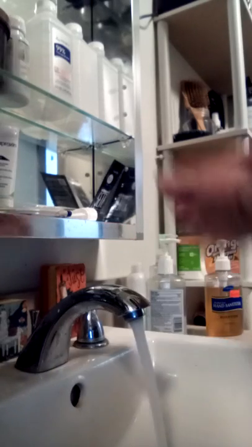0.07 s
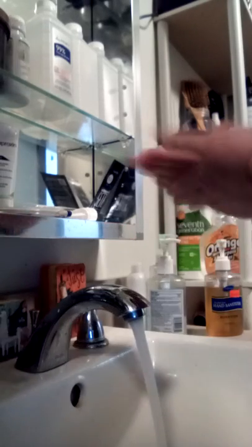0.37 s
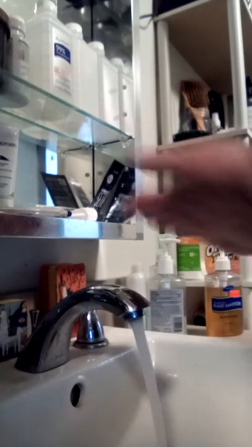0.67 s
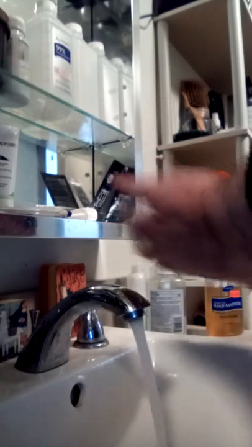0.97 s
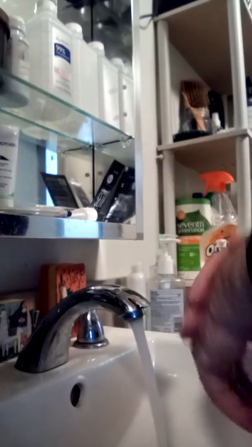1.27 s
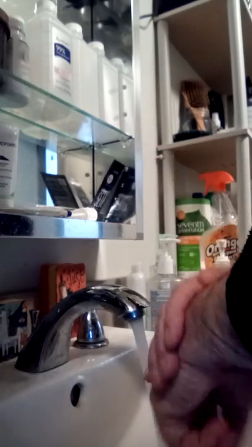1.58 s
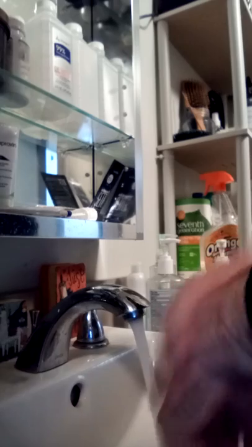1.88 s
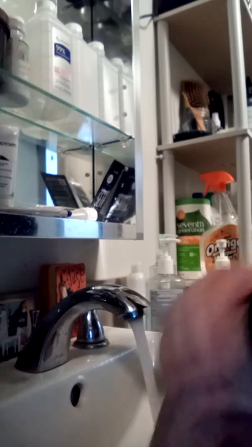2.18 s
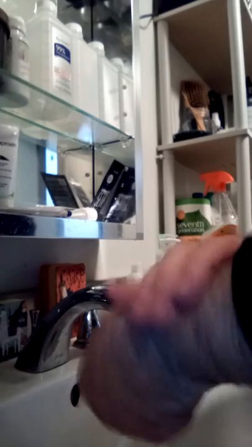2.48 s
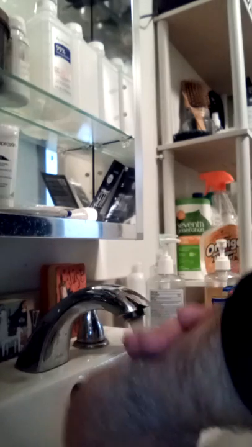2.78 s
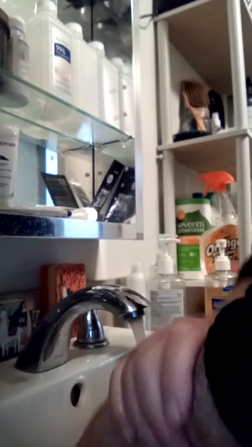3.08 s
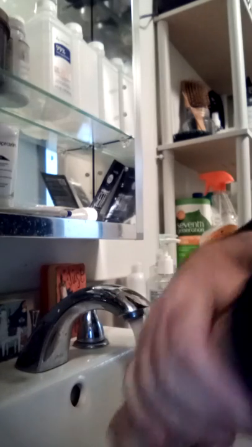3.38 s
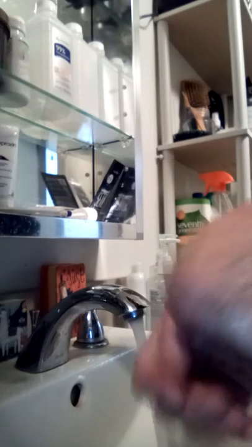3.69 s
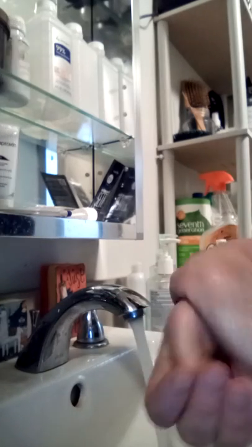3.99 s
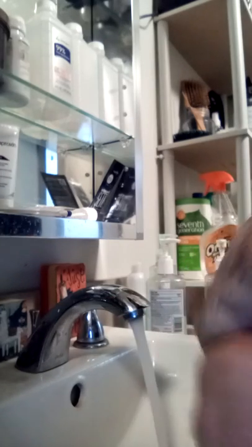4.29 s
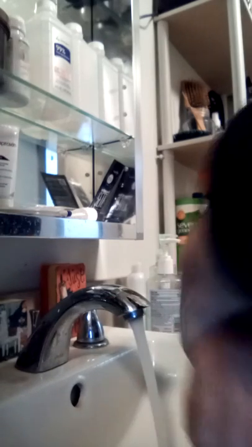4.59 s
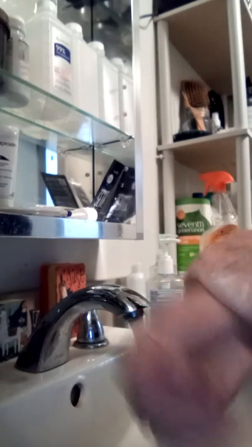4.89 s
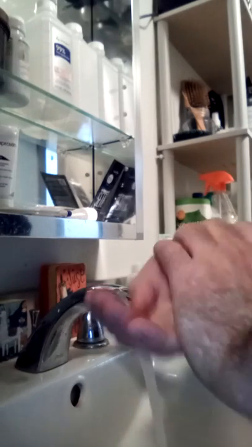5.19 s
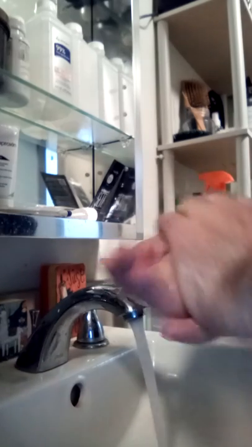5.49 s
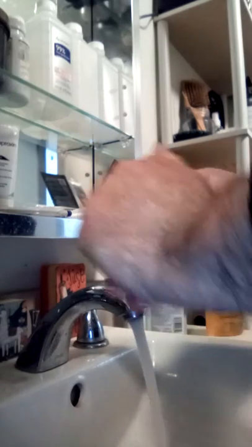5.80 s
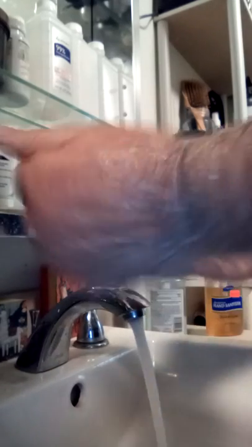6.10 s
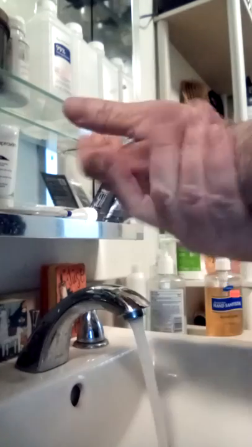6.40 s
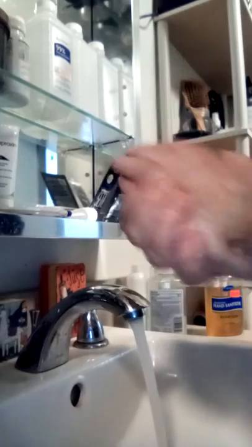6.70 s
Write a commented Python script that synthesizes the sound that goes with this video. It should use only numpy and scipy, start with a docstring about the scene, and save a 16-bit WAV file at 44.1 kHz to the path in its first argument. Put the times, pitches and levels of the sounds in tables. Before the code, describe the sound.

Someone washes their hands, soft wet squishes dotting the constant fizz of a tap running into a ceramic basin.

```python
"""Washing hands under a tap.

An aerated jet fizzes and spatters in a ceramic basin and sets it droning; the drain burbles.
Wet hands rub, squelch and shade the spray as they pass. A few soft low bumps sound underneath.
Small bathroom, small microphone with a high treble resonance."""
import sys
import numpy as np
from scipy import signal
from scipy.fft import rfft, irfft
from scipy.io import wavfile
from scipy.ndimage import uniform_filter1d

SR = 44100
rng = np.random.default_rng(int(sys.argv[2]) if len(sys.argv) > 2 else 0)


def output_pcm(signal):
    """Save a mono or channel-first signal as 16-bit PCM at the path in sys.argv[1].

    Samples are clipped to [-1, 1] before scaling.
    """
    pcm = np.clip(np.atleast_2d(signal).T, -1, 1) * 32767
    wavfile.write(sys.argv[1], SR, np.round(pcm).astype(np.int16))


N = 305613
TIME, HZ = np.arange(N) / SR, np.fft.rfftfreq(N, 1 / SR)


def spray():
    """The jet breaks up on the ceramic: fizz and pops, surging together as it flutters."""
    # spray spectrum: (frequency [Hz], level [dB])
    colour = [(500, -40), (900, -28), (1120, -16), (1500, -18.5), (1800, -20), (2700, -15.5), (3400, -13.5),
              (4200, -7.5), (4950, -8.5), (6300, -3), (6800, -6.5), (7300, -10.5), (8500, -20.5),
              (11000, -16.5), (16000, -17.5)]
    # standing waves in the bowl: (frequency [Hz], width [Hz], gain [dB])
    bowl = [(1114, 15, 3.5), (1240, 36, -2.5), (1410, 320, 3.5), (2090, 46, 3.5), (2230, 46, 3.5),
            (2670, 230, 4), (3470, 48, -6.5), (4143, 150, 4), (4600, 66, 3), (4960, 130, -0.5),
            (5570, 120, 3.5), (6184, 217, 5.5), (6380, 150, -3.5), (6650, 360, 3), (7030, 190, -2),
            (9050, 150, -4.5), (10250, 310, 2.5), (10700, 620, -4.5), (12300, 320, -5), (14000, 260, -4),
            (15060, 130, -2)]
    fizz = rng.standard_normal(N)
    pops = bubbles(per_s=3200, spread_db=2.5, cycles=2.4, low_hz=2060, high_hz=16150, clump_db=2.5)
    spatter = bubbles(per_s=600, spread_db=0.5, cycles=10, low_hz=2634, high_hz=7325,
                      clump_db=2.5, count=16)
    flutter = gain_of(0.63 * wander(rate_hz=80))
    water = (gain_of(7) * fizz + pops + gain_of(-5.5) * spatter) * flutter
    bowl_db = sum(db * bell(hz, width_hz) for hz, width_hz, db in bowl)
    return hand_shade(evened(coloured(water, spectrum_db(colour) + bowl_db)))


def bubbles(per_s, spread_db, cycles, low_hz, high_hz, clump_db, count=40):
    """Bubbles burst in clumps, each a brief dying ring; most faint, a few loud."""
    t, out = np.arange(1024) / SR, np.zeros(N)
    for hz in np.linspace(low_hz, high_hz, count):
        pop_db = spread_db * np.minimum(rng.exponential(1, N), 4) + clump_db * wander(rate_hz=22)
        pops = gain_of(pop_db) * (rng.random(N) < per_s / count / SR)
        ring = np.sin(2 * np.pi * hz * t) * np.exp(-t * hz / cycles)
        out += signal.oaconvolve(pops, evened(ring))[:N]
    return evened(out)


def hand_shade(x, corner_hz=1200, low_db=-48):
    """Passing hands screen the treble; lower sound bends round them and stays steady."""
    # spray above the corner: (time [s], level [dB])
    treble = [(0, -47), (0.3, -47.5), (1.05, -47), (1.4, -48), (1.95, -48), (2.6, -48), (3.3, -48.5),
              (3.55, -47.5), (4.8, -48), (5.35, -47), (5.95, -47.5), (6.4, -47.5), (6.93, -48)]
    low = irfft(rfft(x) / (1 + (HZ / corner_hz) ** 8), N)
    return gain_of(low_db) * low + envelope(treble) * (x - low)


def stirred(x, echo_gain=0.11, delay_s=0.001104, swing_s=0.000231, size=512):
    """Moving hands open and cover the bowl and reflect the sound; the colour flickers."""
    # hand position: (time [s], clearance [1 = lifted away, 0 = beside the jet, -1 = over the bowl])
    clearance = [(0, .9), (.6, 1), (1.12, 1), (1.35, -.1), (1.7, 0.91), (2.05, -0.092), (2.3, -1),
                 (2.8, -0.65), (3.3, -0.87), (3.52, -0.14), (4.2, 0.055), (5.1, -0.47), (5.6, 0.14),
                 (6.2, 1), (6.93, 1)]
    # open-bowl resonances, damped by the hands: (frequency [Hz], width [Hz], gain when clear [dB])
    open_bowl = [(960, 110, 2.5), (1910, 120, 2), (2300, 140, 3.5)]
    # bands changed by hands over the bowl: (frequency [Hz], width [Hz], gain [dB])
    screened = [(1450, 910, 2), (2650, 280, -3), (5600, 380, -2), (7550, 550, -1), (9500, 1500, -2.2),
                (11000, 700, 1.2)]
    framing = dict(fs=SR, nperseg=size, noverlap=size - size // 4)
    bins_hz, t, frames = signal.stft(x, **framing)
    bins_hz = bins_hz[:, None]
    clear = np.interp(t, *np.transpose(clearance))
    open_db = sum(db * bell(hz, width_hz, bins_hz) for hz, width_hz, db in open_bowl)
    screen_db = sum(db * bell(hz, width_hz, bins_hz) for hz, width_hz, db in screened)
    hands_db = open_db * clear + screen_db * np.maximum(-clear, 0)
    grid = frames.shape, t[1], SR / size
    fine_db = 1.05 * patches(*grid, length_s=0.02, width_hz=520)  # like-sized bubbles come and go
    # brief random dips in the low burble around 750 Hz
    dips_db = 3.5 * np.minimum(patches(*grid, length_s=0.057, width_hz=320), 0.5)
    low_band = 1 / (1 + (2 * (bins_hz - 750) / 560) ** 4)
    lag_s = delay_s + swing_s * np.interp(t, TIME, wander(rate_hz=2.3))
    skin_comb = 1 + echo_gain * np.exp(-2j * np.pi * bins_hz * lag_s)
    frames = frames * gain_of(hands_db + fine_db + dips_db * low_band) * skin_comb
    return signal.istft(frames, **framing)[1][:N]


def patches(shape, frame_s, bin_hz, length_s, width_hz):
    """Smooth random field over frequency and time, rms 1."""
    across = np.fft.fftfreq(shape[0], bin_hz)[:, None] * width_hz
    along = np.fft.fftfreq(shape[1], frame_s) * length_s
    smooth = np.exp(-2 * across ** 2) / (1 + (2 * along) ** 2)
    return evened(np.fft.ifft2(np.fft.fft2(rng.standard_normal(shape)) * smooth).real)


def hands(gain_db=-1):
    """Rubbing strokes and the squelches they press out."""
    # wet squelches: (time [s], level [dB], pitch [Hz], width [share of pitch], decay [s])
    squelches = [ (0.043, -39, 6200, .12, 0.0026), (0.080, -48, 11500, 0.17, .003),
                 (0.258, -53, 10000, .08, .003), (0.323, -39, 6100, .1, .002),
                 (0.421, -49, 3400, .2, 0.0044), (0.5377, -31.5, 4800, 0.37, 0.0015),
                 (0.651, -41, 6250, .12, .0012), (0.661, -42, 6750, .12, .0014),
                 (0.717, -40, 6380, 0.11, .0012), (0.734, -40, 4900, .2, .0015),
                 (0.742, -41, 5640, .07, .002), (0.781, -56, 9000, .07, .003),
                 (0.837, -44, 4200, 0.092, 0.0044), (0.846, -50, 3200, .25, .003),
                 (0.8582, -46.5, 3130, 0.23, 0.0041), (0.863, -50.5, 2550, .15, 0.0025),
                 (0.863, -58.5, 1090, 0.36, 0.006), (0.936, -36, 6650, 0.091, 0.0035),
                 (1.110, -41, 5530, 0.09, .003), (1.151, -44, 4150, .14, .002),
                 (1.156, -50, 7700, .15, .003), (1.236, -38, 6100, .15, .0014),
                 (1.313, -52, 2600, .1, .003), (1.339, -41, 6060, 0.18, 0.0011),
                 (1.528, -54, 11200, .17, .005), (1.764, -37, 6000, .1, 0.0022),
                 (1.894, -35, 5900, 0.22, 0.0018), (2.236, -39, 5740, .09, .002),
                 (2.332, -40, 5700, .09, .0025), (2.574, -41.5, 4200, .2, 0.0022),
                 (2.693, -46, 7200, .08, .002), (2.961, -50, 3270, .14, 0.0018),
                 (3.570, -37.5, 6150, .2, .0018), (3.579, -53, 8000, .15, .002),
                 (3.614, -43, 3900, 0.38, .0016), (3.995, -39, 6100, 0.16, .003),
                 (4.033, -43, 4100, .25, .002), (4.068, -43, 6600, .2, .0018),
                 (4.345, -37.5, 5820, .15, 0.0018), (4.364, -42.5, 4200, .1, .002),
                 (4.406, -46, 4100, .2, 0.0022), (4.668, -45, 7240, .1, .002),
                 (4.848, -50, 12400, .07, .003), (4.858, -43, 4650, .12, 0.0022),
                 (4.866, -39, 6200, 0.19, 0.0033), (4.872, -52, 2450, .14, .003),
                 (4.888, -43, 4000, 0.23, .0017), (4.967, -41.5, 4300, .14, .002),
                 (5.320, -40, 6560, 0.16, .004), (5.327, -39, 5170, .1, .002),
                 (5.381, -38, 6450, 0.097, 0.0025), (5.385, -53, 2750, .12, .003),
                 (5.406, -41, 6860, .08, .002), (5.408, -42.5, 3970, .14, .003),
                 (5.720, -43, 4600, .12, .002), (5.879, -37, 6200, .17, .0017),
                 (5.995, -46, 7300, 0.059, .003), (6.032, -38, 5870, 0.11, 0.0018),
                 (6.128, -42, 4160, .1, .002), (6.189, -40, 6300, 0.2, 0.006),
                 (6.205, -47.5, 10000, .16, .003), (6.255, -51, 3500, .13, .003),
                 (6.396, -38.5, 6160, .1, 0.0037), (6.432, -33, 6250, 0.083, 0.0024),
                 (6.470, -45, 3900, .3, .002), (6.500, -44, 4000, .08, .002),
                 (6.523, -51.5, 2100, .07, 0.004), (6.531, -54, 1860, 0.079, 0.0045),
                 (6.533, -59, 1050, .15, 0.0054), (6.554, -38, 6130, 0.07, 0.0018),
                 (6.604, -42.5, 4600, .1, .003), (6.6902, -40.5, 2190, .11, 0.0036),
                 (6.6908, -39, 4200, .12, 0.0042), (6.709, -54, 2400, .13, .004),
                 (6.798, -39, 6200, 0.11, 0.0022), (6.845, -44, 4500, .25, .003)]
    # skin-on-skin strokes: (centre [s], half width [s], level [dB], pitch [Hz])
    rubs = [(0.171, 0.024, -54.5, 4000), (1.029, 0.048, -59, 3100), (1.973, 0.025, -52, 5100),
            (3.71, 0.033, -60, 3340), (3.845, 0.026, -59, 3180), (4.012, 0.03, -55.5, 3930),
            (4.37, 0.022, -64, 4100), (4.512, 0.04, -54, 3930), (4.873, .025, -61, 3230),
            (5.387, 0.047, -63, 3300), (5.479, .02, -59, 3940), (5.624, 0.02, -56, 3560),
            (6.26, 0.018, -57, 3600), (6.268, .015, -54, 6700), (6.377, .025, -58, 3300),
            (6.475, 0.028, -60, 3100)]
    out = np.zeros(N)
    for at_s, db, hz, width, decay_s in squelches:
        add(out, at_s, squelch(db, hz, width, decay_s))
    for centre_s, half_s, db, hz in rubs:
        add(out, centre_s - 2 * half_s, rub(half_s, db, hz))
    return gain_of(gain_db) * out


def squelch(db, hz, width, decay_s, rise_s=0.00031, smack_db=-7):
    """Froth spurts from the palms: a ringing air pocket inside a broader wet smack."""
    t = np.arange(2048) / SR
    ring = evened(air_pocket(rng.standard_normal(len(t)), hz, width))
    smack = evened(air_pocket(rng.standard_normal(len(t)), hz, width=0.3))
    froth = ring + gain_of(smack_db) * smack
    spurt = (1 - np.exp(-t / rise_s)) ** 2 * np.exp(-t / decay_s)
    spurt /= spurt.max()
    return gain_of(db) * evened(froth * spurt) * np.sqrt(np.mean(spurt ** 2))


def rub(half_s, db, hz, ticks_per_s=2400):
    """Wet skin slides: tiny water films snap in a crackle that swells and fades."""
    t = np.arange(SR // 2) / SR
    stroke = np.sin(np.pi * np.minimum(t / (4 * half_s), 1)) ** 2
    ticks = rng.standard_normal(len(t)) * (rng.random(len(t)) < ticks_per_s / SR)
    crackle = air_pocket(ticks, hz, width=0.64)
    return gain_of(db) * evened(crackle * stroke) * np.sqrt(np.mean(stroke ** 2))


def air_pocket(x, hz, width):
    """Resonance of the air between the palms; width as a share of pitch."""
    bins_hz = np.fft.rfftfreq(len(x), 1 / SR) + 1
    detuning = (bins_hz / hz - hz / bins_hz) / (2 * width)
    return irfft(rfft(x) / (1 + detuning ** 2) ** 2, len(x))


def basin(level_db=-64, churn_db=1.5, churn_hz=9, thrum_ebb_db=2.5):
    """Jet turbulence drives the basin's low modes; each swells and ebbs by itself."""
    # basin modes: (frequency [Hz], nominal width [Hz], level [dB])
    modes = [(72, 14, -19), (107.6, 10, -9), (141.6, 9.4, 3.5), (161, 9.5, 1), (205, 29, -5.5),
             (258.2, 7.2, 6.5), (280.9, 4.3, 8.5), (300.6, 28, -2.5), (330, 23, -0.5), (373, 26, -5.5),
             (435, 23, -8), (500, 56, -15)]
    # broad thrum under the modes: (frequency [Hz], level [dB])
    thrum = [(20, -28), (55, -30), (110, -12.5), (250, -6), (400, -20.5), (600, -41), (900, -48),
             (2000, -64)]
    drone = coloured(rng.standard_normal(N), spectrum_db(thrum))
    drone *= evened(gain_of(thrum_ebb_db * wander(churn_hz)))
    for hz, width_hz, db in modes:
        mode = coloured(rng.standard_normal(N), db + 20 * np.log10(bell(hz, 1.27 * width_hz)))
        drone += mode * evened(gain_of(churn_db * wander(churn_hz)))
    running_rms = np.sqrt(uniform_filter1d(drone ** 2, size=SR // 3))
    return gain_of(level_db) * drone / running_rms


def drain(ebb_db=3, ebb_hz=5.5, low_hz=400, high_hz=1300, count=5):
    """Larger bubbles burble in the run-off; the bands swell and ebb, singly and together."""
    # the low burble swells and ebbs: (time [s], level [dB])
    burble_level = [(0, -71), (0.35, -80.5), (0.5, -76), (0.7, -78), (0.78, -75), (0.98, -72.5), (1.2, -81),
                    (1.38, -73), (1.5, -72.5), (1.75, -77.5), (1.88, -71.5), (2.03, -77), (2.28, -73),
                    (2.58, -81.5), (2.68, -72), (2.85, -80), (3.0, -75), (3.18, -77), (3.35, -70.5),
                    (3.53, -79.5), (3.93, -73.5), (4.03, -85), (4.15, -71), (4.32, -81), (4.45, -83),
                    (4.55, -73.5), (4.7, -77.5), (4.86, -76.5), (4.98, -71.5), (5.25, -75.5), (5.5, -79),
                    (5.68, -74), (5.87, -82), (6.05, -73.5), (6.15, -80), (6.25, -76.5), (6.7, -76),
                    (6.93, -82)]
    # slosh spectrum: (frequency [Hz], level [dB])
    slosh = [(300, -14), (420, 3), (520, 4), (680, -2.5), (950, 1), (1400, -30), (3000, -52)]
    burble, step_hz = np.zeros(N), (high_hz - low_hz) / count
    for hz in low_hz + step_hz * np.arange(count):
        cluster = bubbles(per_s=320, spread_db=1, cycles=8.5, low_hz=hz, high_hz=hz + 0.825 * step_hz,
                          clump_db=1.5, count=5)
        burble += cluster * gain_of(ebb_db * wander(ebb_hz))
    return envelope(burble_level) * evened(coloured(burble, spectrum_db(slosh)))


def bumps():
    """Soft low bumps, each swelling and dying within a few cycles."""
    # bumps: (time [s], peak [dB], pitch [Hz], decay [s])
    events = [(2.07, -70, 58, .01), (5.22, -73, 82, .04), (6.37, -78, 80, 0.04), (6.67, -74, 80, .04)]
    out = np.zeros(N)
    for at_s, db, hz, decay_s in events:
        t = np.clip(TIME - at_s, 0, 1)
        out += gain_of(db) * np.sin(2 * np.pi * hz * t) * t / decay_s * np.exp(1 - t / decay_s)
    return out


def bathroom(x, wet_db, t60_s=0.21, count=8):
    """Close hard walls return a short, dense tail that shifts as the splash point moves."""
    t, echo = np.arange(SR // 3) / SR, np.zeros(N)
    places = np.array([wander(rate_hz=5) for _ in range(count)])
    for share in places / np.linalg.norm(places, axis=0):
        tail = rng.standard_normal(len(t)) * gain_of(-60 * t / t60_s) * (t > 0.003)
        echo += signal.oaconvolve(x * share, tail / np.linalg.norm(tail))[:N]
    return (x + gain_of(wet_db) * echo) / np.hypot(1, gain_of(wet_db))


def gain_of(db):
    """Decibels to amplitude."""
    return 10 ** (np.asarray(db) / 20)


def evened(x):
    """Scales to rms 1."""
    return x / np.sqrt(np.mean(x ** 2) + 1e-20)


def spectrum_db(points):
    """(Hz, dB) points interpolated over log frequency."""
    hz, db = np.transpose(points)
    return np.interp(np.log(HZ + 1), np.log(np.maximum(hz, 1)), db)


def envelope(points):
    """(s, dB) points to a gain per sample."""
    return gain_of(np.interp(TIME, *np.transpose(points)))


def bell(hz, width_hz, bins_hz=HZ):
    """Power response of one resonance."""
    return 1 / (1 + (2 * (bins_hz - hz) / width_hz) ** 2)


def coloured(x, db):
    """Filters by a gain in dB per bin."""
    return irfft(rfft(x) * gain_of(db), N)


def wander(rate_hz):
    """Random drift up to about rate_hz, rms 1."""
    knots_s = np.arange(0, TIME[-1] + 1, 0.5 / rate_hz)
    return evened(np.interp(TIME, knots_s, rng.standard_normal(8192)[:len(knots_s)]))


def add(mix, at_s, sound):
    """Mixes a sound in at a time."""
    part = mix[round(at_s * SR):][:len(sound)]
    part += sound[:len(part)]


def scene():
    """Water and hands in the room, over the basin drone; mono."""
    water = stirred(bathroom(spray(), wet_db=-11.5) + drain() + basin())
    return (water + bumps() + bathroom(hands(), wet_db=-7.5))[None]


def record(dry, port_hz=15150, port_width_hz=1545, port_db=19, cutoff_hz=15770):
    """Microphone port resonance in the high treble, then the band limit."""
    lift_db = port_db / (1 + abs(2 * (HZ - port_hz) / port_width_hz) ** 3)
    lowpass = signal.firwin(2047, cutoff_hz, window=("kaiser", 9), fs=SR)
    return signal.oaconvolve(coloured(dry[0], lift_db), lowpass, "same")[None]


dry = scene()
out = record(dry)
output_pcm(out)
```